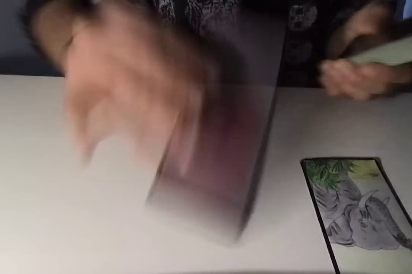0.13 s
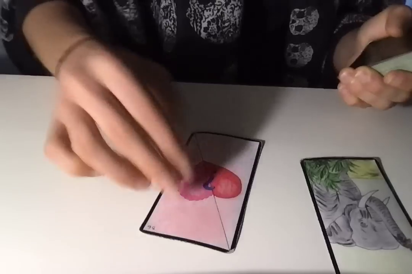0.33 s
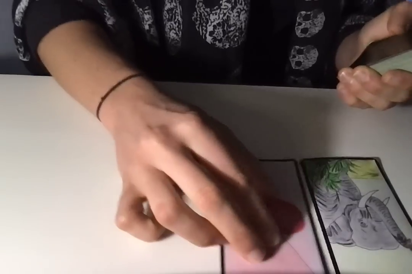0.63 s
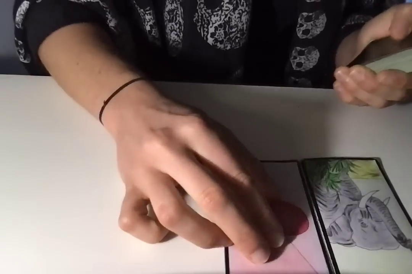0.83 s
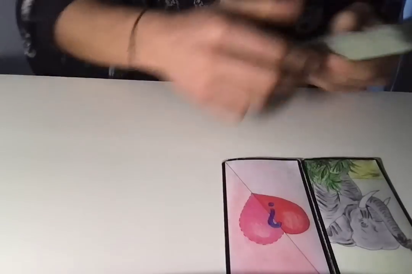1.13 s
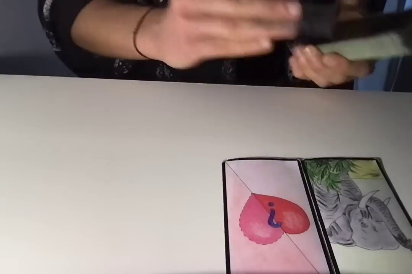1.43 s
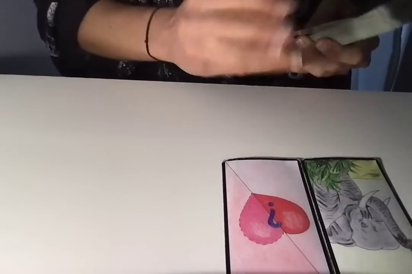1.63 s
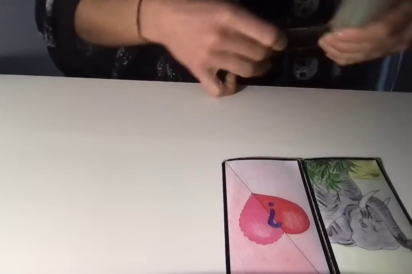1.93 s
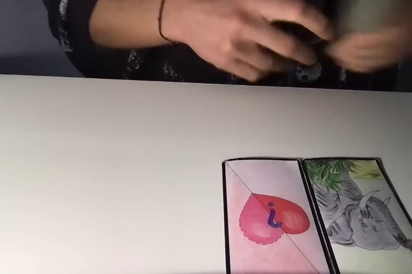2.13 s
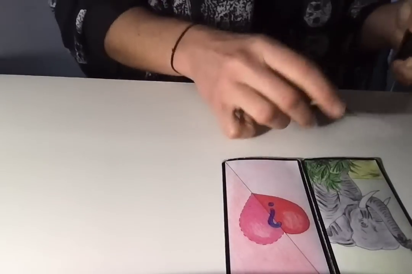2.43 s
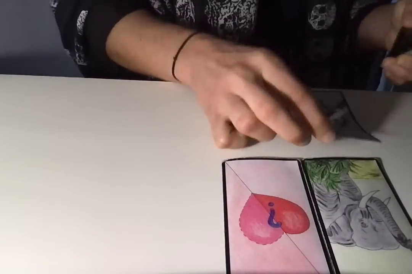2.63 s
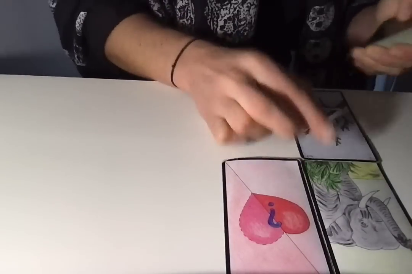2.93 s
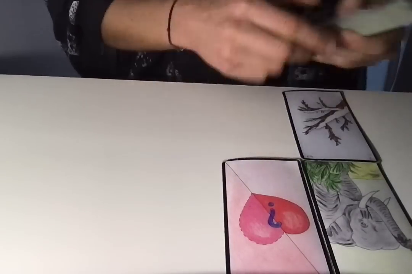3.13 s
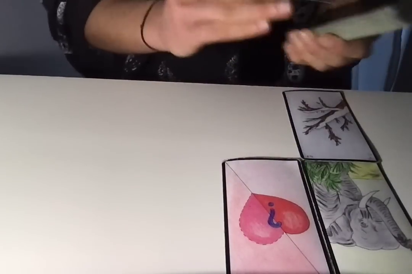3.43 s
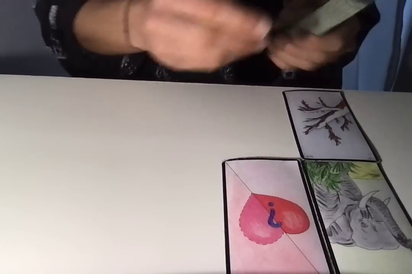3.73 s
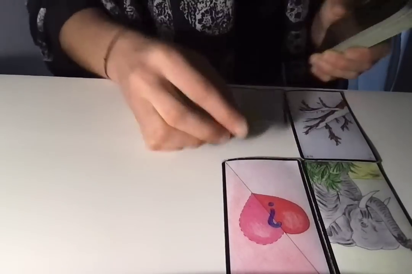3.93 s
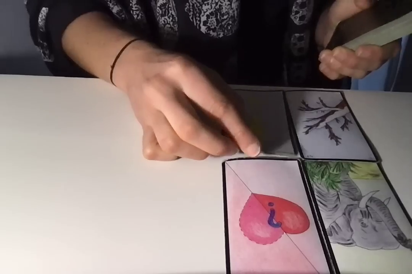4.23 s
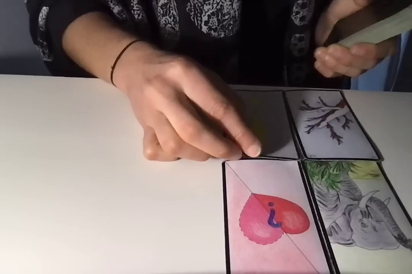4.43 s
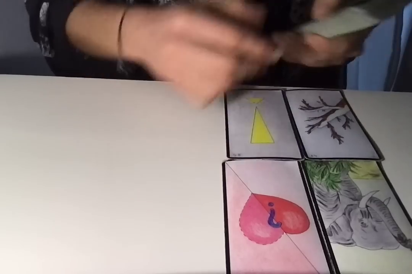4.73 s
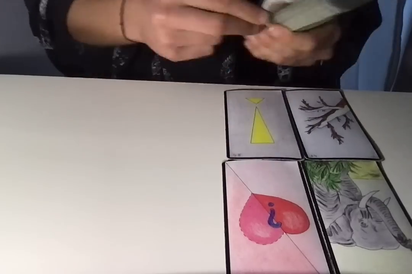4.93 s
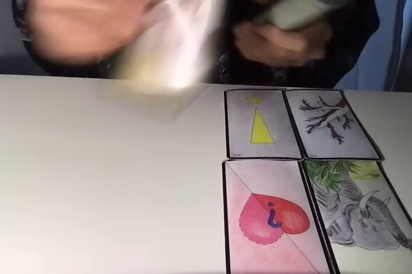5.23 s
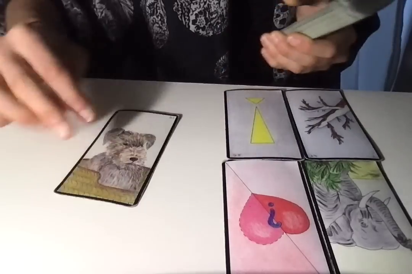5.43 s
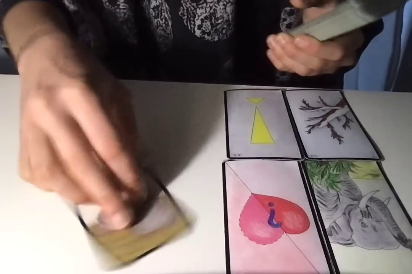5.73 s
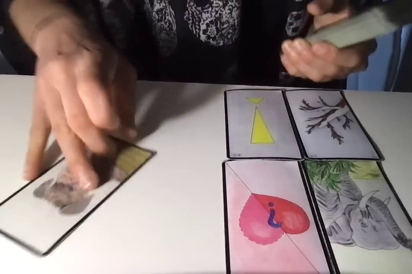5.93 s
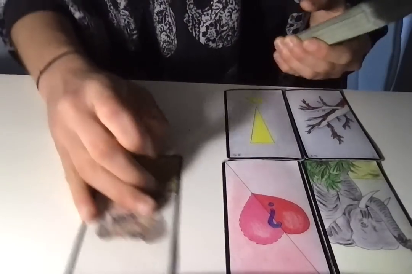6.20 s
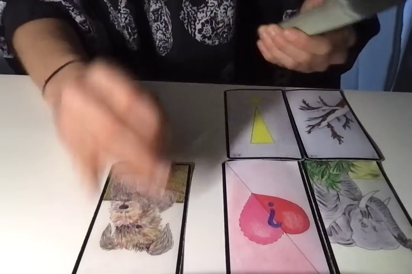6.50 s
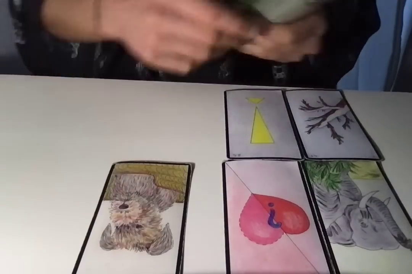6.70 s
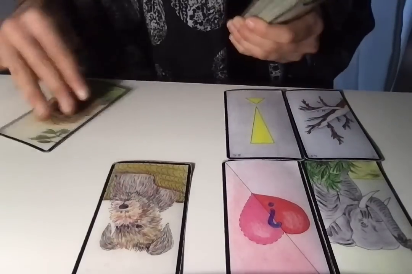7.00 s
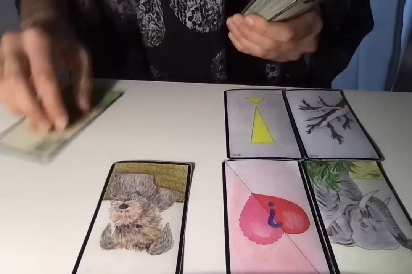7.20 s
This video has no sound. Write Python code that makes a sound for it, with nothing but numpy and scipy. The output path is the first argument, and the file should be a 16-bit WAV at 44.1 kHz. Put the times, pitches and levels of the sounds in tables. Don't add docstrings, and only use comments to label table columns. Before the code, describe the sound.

Someone deals large paper cards indoors, one after another. Dry flicks and rasping pulls from the deck alternate with crisp slaps, edge ticks and small pops of trapped air. Gentle stretches of rustle and near silence separate them. Fingers bump the hollow table softly, and later cards are turned and slid with thin hisses. Faint low table shake, still air and a short dull echo surround the close sounds.

```python
import sys
import numpy as np
from scipy import signal
from scipy.io import wavfile
from scipy.ndimage import uniform_filter1d

SR = 44100
rng = np.random.default_rng(int(sys.argv[2]) if len(sys.argv) > 2 else 0)


def store_wav(level_fs):
    pcm = np.round(np.clip(np.atleast_2d(level_fs), -1, 1) * 32767)
    wavfile.write(sys.argv[1], SR, pcm.T.astype(np.int16))


def voltage_ratio(level):
    return 10 ** (np.asarray(level, float) / 20)


N = 324576


def evened(x):
    return x / np.sqrt(np.mean(x ** 2) + 1e-20)


def read(points, hz):
    f, value = np.transpose(points)
    return np.interp(np.log(hz + 1), np.log(f + 1), value)


def add(mix, s, sound):
    part = mix[round(s * SR):][:len(sound)]
    part += sound[:len(part)]


def ring(x, hz, width):
    r = np.exp(-np.pi * width / SR)
    turn = 2 * np.pi * hz / SR
    return signal.lfilter([1 - r], [1, -2 * r * np.cos(turn), r * r], x) * np.sin(turn)


def moving_ring(x, hz, width):
    turn = np.exp(2j * np.pi * np.cumsum(hz) / SR)
    r = np.exp(-np.pi * width / SR)
    return (turn * signal.lfilter([1], [1, -2 * r, r * r], x / turn)).real


def patchy(x, spectrum, patch_db, size):
    hz, t, z = signal.stft(x, SR, nperseg=size, noverlap=3 * size // 4)
    patches = rng.standard_normal(z.shape[::-1]).T
    patches = uniform_filter1d(patches, size=6, axis=0)
    patches = evened(uniform_filter1d(patches, size=14, axis=1))
    z = z * voltage_ratio(read(spectrum, hz)[:, None] + patch_db * patches)
    return evened(signal.istft(z, nperseg=size, noverlap=3 * size // 4)[1][:N])


# time in seconds, level in dB.
SHAKE = [(0.0, -50), (0.37, -45.5), (0.98, -55), (1.47, -56.5), (2.07, -55), (3.54, -52), (4.96, -56.5),
         (5.43, -47.5), (5.62, -51), (6.6, -57), (7.36, -51)]
# frequency in Hz, level in dB per Hz.
SHAKE_COLOUR = [(12, -21), (20, -6), (49, 6.5), (66, 2.5), (81, -10.5), (113, -14.5), (140, -28),
                (180, -40), (310, -120)]
# frequency in Hz, level in dB per Hz.
AIR_COLOUR = [(65, -44), (110, -15), (151, -2), (254, -20), (289, -19), (430, -26), (458, -25.5),
              (601, -21.5), (858, -21), (1330, -34.5), (1710, -36), (2350, -33), (10200, -40.5),
              (14500, -44), (16500, -46)]
AIR_DB = -67.5


def background():
    s, db = np.transpose(SHAKE)
    low, air = rng.standard_normal((2, N))
    shake_level = voltage_ratio(np.interp(np.arange(N) / SR, s, db))
    shake = shake_level * patchy(low, SHAKE_COLOUR, 2.4, size=4096)
    return shake + voltage_ratio(AIR_DB) * patchy(air, AIR_COLOUR, 0.4, size=1024)


# start in seconds, fall in ms, rasp in dB, low rustle and fine hiss in dB relative to the rasp.
FLICKS = [(0.0, 54, -52, -4.5, -2.5), (0.044, 8.3, -55.5, 8, 11.5), (0.188, 81, -38, -3.5, -10),
          (1.178, 51, -65.5, 7.5, -22.5), (1.321, 52, -48, 1, -7), (1.366, 55, -45, 0, -10),
          (1.731, 70, -65, 7.5, -8), (2.048, 130, -60.5, 2, -15), (2.185, 27, -72, 16.5, -25),
          (2.525, 200, -65, -8, -9), (2.883, 25, -40.5, -7, -19), (2.925, 66, -60, -5, -12),
          (3.096, 29, -66, 1, -7), (3.138, 112, -53.5, 2.5, -16), (3.365, 99, -51, 2.5, -7.5),
          (3.596, 12, -68.5, -11, -16.5), (3.7, 32, -56.5, 4, -21), (3.859, 21, -44, 3, -21),
          (4.496, 22, -48, -3.5, -12), (5.198, 24.5, -56.5, 15, -23), (5.245, 125, -70, 10.5, 3.5),
          (5.35, 78, -42, -5.5, -11), (7, 69, -40.5, -22, 0), (0.191, 20, -36, -6, -6),
          (6.712, 60, -70, 2, -12), (3.374, 40, -48, -4, -14), (5.045, 40, -68, 2, -15),
          (4.925, 35, -74, 0, -30), (2.545, 25, -68, -10, 4)]
FLICK_RISE_MS, FLICK_RISE_SHARE = 4.4, 0.025
# start in seconds, length in ms, rasp in dB, low rustle in dB relative to the rasp.
PULLS = [(1.218, 115, -52, -1), (1.495, 128, -63.5, 9), (1.75, 170, -59, -8.5), (1.939, 123, -71.5, 6),
         (2.088, 82, -56, -5), (2.25, 69, -45, -14.5), (2.32, 185, -57.5, -5.5), (3.224, 98, -50, -10.5),
         (3.47, 127, -66.5, 10.5), (3.744, 94, -56, 0), (5.122, 91, -51, -8), (6.54, 59, -62, -20),
         (6.664, 49, -61, -7)]
PULL_RISE_SHARE, PULL_HISS_DB, PULL_HISS_PER_DB = 0.31, -6.5, 0.35
# start in seconds, rise in ms, fall in ms, rasp in dB, fine hiss in dB relative to the rasp.
GLIDES = [(0.398, 52, 250, -56, 3.5), (0.974, 74, 57, -65, -2.5), (3.898, 22, 88, -61, -1),
          (5.582, 45, 95, -59, 9), (5.66, 117, 31, -64, 13.5), (5.797, 86, 33, -69, 24),
          (5.9, 18.6, 100, -60, 1), (6.027, 26, 95, -47.5, -3), (6.08, 52, 205, -61.5, 6),
          (6.79, 43, 84, -51.5, -2.5), (6.92, 33, 27, -58.5, 2), (7.175, 29, 49, -54, 3.5),
          (7.22, 46, 420, -66.5, 17.5), (6.002, 22, 40, -76, 23.5), (3.3, 14, 4, -50, -5),
          (0.398, 6, 30, -60, -8)]
GLIDE_RUSTLE_DB, GLIDE_RUSTLE_PER_DB = -4.5, 0.2


def strokes():
    rows = []
    for s, fall_ms, *levels in FLICKS:
        rows.append((s, FLICK_RISE_MS + FLICK_RISE_SHARE * fall_ms, fall_ms, *levels))
    for s, ms, db, rustle_db in PULLS:
        hiss_db = PULL_HISS_DB + PULL_HISS_PER_DB * rustle_db
        rows.append((s, PULL_RISE_SHARE * ms, (1 - PULL_RISE_SHARE) * ms, db, rustle_db, hiss_db))
    for *row, hiss_db in GLIDES:
        rows.append((*row, GLIDE_RUSTLE_DB + GLIDE_RUSTLE_PER_DB * hiss_db, hiss_db))
    return rows


# frequency in Hz, level in dB per Hz.
RASP = [(800, -45), (1250, -19), (1550, -12.5), (1900, -5.5), (2500, -7), (3000, -7), (3700, -8),
        (4500, -9), (5200, -12.5), (6000, -17.5), (7500, -13), (9500, -48), (15000, -110.)]
# frequency in Hz, level in dB per Hz.
RUSTLE = [(65, -13), (110, -2.5), (141, -5.5), (306, -3.5), (412, -17), (708, -10), (1180, -11.5),
          (1400, -24.5), (1820, -50), (3080, -120)]
# frequency in Hz, level in dB per Hz.
HISS = [(2940, -23.5), (5000, -11), (8000, -7), (9910, -12), (11700, -8), (13800, -15), (14900, -9.5),
        (16100, -30.5), (16500, -51.5)]


def slides():
    slip_sizes = np.minimum(rng.exponential(1, N), 5)
    grit = rng.standard_normal((3, N)) * voltage_ratio(2.6 * slip_sizes)
    flutter = evened(uniform_filter1d(rng.standard_normal(N), size=200))
    waver = voltage_ratio(np.outer([2.6, 2.6, 1.1], flutter))
    layers = [patchy(grit[0], RASP, 2.5, size=256), patchy(grit[1], RUSTLE, 3.1, size=512),
              patchy(grit[2], HISS, 2.2, size=512)]
    power = np.zeros((3, N))
    for s, rise_ms, fall_ms, rasp_db, rustle_db, hiss_db in strokes():
        rise = np.arange(0, rise_ms / 1000, 1 / SR) / (rise_ms / 1000)
        fall = np.arange(0, fall_ms / 1000, 1 / SR) / (fall_ms / 1000)
        dying = 1.15 + 1.2 * np.exp(-(rise_ms / 28) ** 2)
        speed = np.concatenate([np.sin(np.pi / 2 * rise), np.cos(np.pi / 2 * fall) ** dying])
        for layer, db in zip(power, (rasp_db, rasp_db + rustle_db, rasp_db + hiss_db)):
            add(layer, s, (voltage_ratio(db) * speed) ** 2)
    return (np.sqrt(power) * layers * waver).sum(0)


def singing_slips(table, width_hz, width_share):
    out = np.zeros(N)
    for (s, ms, from_hz, to_hz, db), chance in zip(table, rng.standard_normal((len(table), 2, 9000))):
        u = np.arange(0, ms / 1000, 1 / SR)[:9000] / (ms / 1000)
        slow_grip = evened(uniform_filter1d(chance[1], size=180))
        slips = (chance[0] * voltage_ratio(3.0 * chance[1] + 3.5 * slow_grip))[:len(u)]
        pitch = from_hz * (to_hz / from_hz) ** u
        sound = evened(moving_ring(slips, pitch, width_hz + width_share * from_hz))
        add(out, s, voltage_ratio(db) * sound * np.minimum(u / 0.11, 1) * (1 - u) ** 0.33)
    return out


# start in seconds, length in ms, start pitch in Hz, end pitch in Hz, level in dB.
DRAGS = [(0.0, 30, 2200, 2200, -56), (2.34, 140, 2250, 2650, -55), (2.345, 70, 2750, 2700, -58),
         (2.53, 60, 5000, 4800, -62), (2.53, 150, 2200, 2350, -67), (1.83, 65, 2100, 2200, -60),
         (3.225, 85, 2150, 2300, -56), (3.378, 50, 2550, 2400, -52), (3.752, 50, 1750, 2150, -56),
         (3.763, 32, 2700, 3000, -56), (3.765, 32, 1050, 1050, -55), (3.98, 150, 2450, 2300, -72),
         (5.343, 9, 1350, 900, -38), (6.93, 36, 5300, 5000, -59), (6.93, 38, 2500, 2250, -59),
         (7.02, 50, 2900, 3200, -46), (6.038, 70, 2300, 2500, -52)]


def drags():
    return singing_slips(DRAGS, width_hz=200, width_share=.15)


# start in seconds, level in dB, pitch in Hz, length in ms.
PRESSES = [
    (0.029, -33.5, 63.6, 35.6),
    (1.217, -42, 89, 28),
    (1.334, -24.5, 74, 5.5),
    (1.911, -38.5, 84, 25),
    (3.313, -27.5, 80.6, 11.5),
    (5.255, -37, 88, 18),
    (5.331, -30.5, 81.5, 29),
    (6.935, -42, 71, 39),
]
# start in seconds, level in dB, pitch in Hz, length in ms.
LIFTS = [(0.271, -40, 58, 68), (0.441, -40.5, 55, 13), (0.514, -44.5, 62.5, 24), (3.856, -32.5, 72.4, 19),
         (3.938, -43.5, 74.7, 19), (5.206, -37, 78, 22), (5.594, -32, 60.5, 25), (5.918, -29.5, 78, 26.6),
         (5.989, -42.5, 74.5, 30), (6.88, -32, 70, 11.5), (7.188, -27.5, 85, 28.7)]


def thuds():
    out = np.zeros(N)
    for s, db, hz, ms, push in [(*row, 1) for row in PRESSES] + [(*row, -1) for row in LIFTS]:
        u = np.arange(round(4 * ms * SR / 1000)) / (ms * SR / 1000)
        swing = (1 - np.exp(-(u / .3) ** 2)) * np.exp(-(u / 1.3) ** 3)
        thud = push * 1.51 * voltage_ratio(db) * swing * np.sin(2 * np.pi * hz * u * ms / 1000)
        add(out, max(s - 0.0002 * ms, 0), thud)
    return out


# peak time in seconds, pitch in Hz, length in ms,
# level in dB.
BLIPS = [(.049, 2850, 8.4, -44), (.152, 2380, 6.9, -51), (.15, 3100, 9, -54), (.196, 2800, 6.5, -30.5),
         (.2015, 2190, 5, -39), (1.347, 2530, 6.9, -45), (1.379, 3880, 5.8, -40), (2.206, 1800, 10, -56),
         (2.208, 2530, 12, -57), (2.29, 2120, 7.3, -46), (3.146, 1390, 10.5, -50), (3.311, 2300, 10, -49),
         (3.318, 2300, 7, -42), (3.495, 2100, 8, -52.5), (3.606, 2630, 9, -53), (3.8, 2070, 6.5, -44.5),
         (4.26, 1790, 11, -64), (4.5, 4470, 7, -50), (4.573, 2020, 10, -65), (4.832, 2100, 10.2, -63),
         (5.25, 2050, 8.5, -54), (5.316, 2270, 7.1, -55), (5.318, 1290, 6, -54), (5.328, 2380, 6, -50),
         (6.72, 1560, 13, -54), (6.852, 2000, 6.7, -48), (6.882, 2500, 9, -40), (7.017, 2740, 6, -29),
         (7.177, 3100, 5, -45),
         (.153, 840, 7.4, -53), (.28, 438, 25, -52), (.408, 520, 12, -60), (.445, 506, 13, -57),
        (1.247, 696, 8.2, -45), (2.264, 600, 10.3, -36), (2.302, 600, 8.7, -52), (3.187, 428, 13, -51),
        (3.24, 720, 16, -48.5), (3.572, 296, 9.6, -49.5), (3.705, 380, 10, -40.5), (3.804, 600, 7.9, -45.5),
        (4.392, 800, 8, -65.5), (4.5, 329, 9.6, -49), (5.298, 1020, 7, -52), (5.307, 1030, 7, -51),
        (5.36, 1150, 5.5, -37), (5.367, 650, 9, -43), (5.398, 694, 10.4, -46), (5.428, 680, 11.6, -46.5),
        (6.045, 1305, 15, -52), (6.07, 876, 14, -49), (6.08, 340, 18, -46), (6.676, 1060, 8, -57),
        (6.751, 740, 12, -50), (6.873, 736, 12, -47.5), (7.19, 294, 11, -47), (3.712, 180, 26, -42),
        (7.035, 200, 30, -46), (5.2, 170, 22, -46), (3.476, 620, 16, -44), (3.53, 700, 10, -44),
        (3.705, 1000, 8, -48), (5.205, 800, 8, -44), (6.731, 1380, 14, -57), (5.3425, 1050, 5, -27.5),
        (5.075, 650, 20, -56), (5.122, 700, 16, -52),
         (.031, 2750, 6, -35), (2.253, 2400, 6, -42), (2.253, 3900, 5, -45), (3.365, 2600, 8, -40),
         (3.47, 3700, 7, -54), (3.86, 2600, 7, -38), (3.876, 1950, 7, -42), (5.354, 2550, 6, -37),
         (5.385, 2300, 5, -43), (6.77, 2300, 7, -46), (7.005, 2700, 7, -33), (7.017, 4100, 5, -37)]
BLIP_SAG = .06
BLIP_ROUGH, BLIP_GRIT = .5, .25


def blips():
    out = np.zeros(N)
    table = BLIPS
    for (s, hz, ms, db), chance in zip(table, rng.standard_normal((len(table), 2, 2000))):
        u = np.arange(0, ms / 1000, 1 / SR)[:2000] / (ms / 1000)
        turns = np.cumsum(hz * (1 + BLIP_SAG * (.5 - u))) / SR
        flutter = 1 + BLIP_ROUGH * evened(uniform_filter1d(chance[0], size=round(SR / hz)))[:len(u)]
        grit = BLIP_GRIT * evened(ring(chance[1], hz, hz))[:len(u)]
        swell = 1.1 * voltage_ratio(db) * np.sin(np.pi * u ** .75) ** 2
        add(out, s - ms / 2500, swell * (flutter * np.sin(2 * np.pi * turns) + grit))
    return out


# frequency in Hz, width in Hz, level in dB.
CARD = [(1150, 150, 5), (2240, 230, 11.5), (2680, 500, 14), (3760, 810, 4), (5200, 620, -8.5)]
CARD_MIN_WIDTH_HZ = 220
CREEP = 50


def snap(crack_db, hollow_db, sizzle_db, ms, hollow_hz, chance):
    t = (np.arange(chance.shape[1]) - CREEP) / SR
    creep = .5 * np.exp(t / 0.00048)
    crackle = np.exp(-abs(t / (0.0015 * ms)) ** 1.6)
    slips = .5 * chance[0] * (chance[1] > .9) * np.where(t < 0, creep, crackle)
    slips[CREEP] = -3.4 / np.sqrt(ms)
    bend = np.exp(.06 * chance[1, -len(CARD):])
    crack = 0
    for b, (hz, width, db) in zip(bend, CARD):
        tilt_db = 1.2 * (sizzle_db + 12.5) * np.log2(max(hz / 2500, 1))
        crack = crack + voltage_ratio(db + tilt_db) * ring(slips, hz * b, max(width, CARD_MIN_WIDTH_HZ))
    hollow = ring(ring(slips, hollow_hz, 290), hollow_hz, 290)
    hollow = hollow + 0.19 * ring(slips, 0.27 * hollow_hz, 100)
    bright = signal.lfilter(*signal.butter(2, 4200, "high", fs=SR), slips)
    sizzle = ring(bright, 5600, 3500)
    head, long_head = slice(CREEP, CREEP + 130), slice(CREEP, CREEP + 260)
    layers = crack / np.std(crack[head])
    layers = layers + voltage_ratio(hollow_db - 0.6) * hollow / np.std(hollow[long_head])
    layers = layers + voltage_ratio(sizzle_db - 10.5) * sizzle / np.std(sizzle[head])
    return voltage_ratio(crack_db - 0.5) * layers


# start in seconds, crack in dB, hollow ring and sizzle in dB relative to the crack, hollow pitch in Hz.
KNOCKS = [(0.0294, -27, 3, -14, 700), (1.2157, -36.5, 7.5, -9, 710), (1.4955, -56, 21, -22, 513),
          (1.5084, -49.5, 8, -10, 524), (1.5193, -52, -1, -24, 566), (1.5401, -41.5, 10, -5, 506),
          (1.7325, -52, 9, 2, 520), (1.979, -55.5, 0, -22, 566), (2.118, -61, 15, 0, 605),
          (2.1892, -53.5, 1, -16, 660), (3.3165, -38, 8.5, -1, 502), (3.4702, -46, 11, -18, 536),
          (3.5121, -40.5, 3, -8, 696), (3.5312, -51, 11, -1, 656), (4.8272, -60.5, 3, -6, 590),
          (5.0283, -57, 7, -34, 596), (5.0982, -49, 3, -34, 734), (5.183, -42.5, -0.5, 3, 650),
          (5.2605, -44.5, 7.5, 9.5, 392), (5.3265, -56, 9, -32.5, 590), (6.6734, -58, -2, 1, 1030),
          (6.7693, -35, 1, -4.5, 720), (6.8665, -49, -4, 8, 740)]
KNOCK_MS, KNOCK_MS_PER_DB = 2.47, -.09
# start in seconds, crack in dB, sizzle in dB relative to the crack, crackle length in ms.
CATCHES = [(0.1794, -31.5, 12, 4), (1.332, -22.5, -9.5, 2.5), (1.6141, -52.5, -4, 3.2),
           (1.936, -47, -35, 4.4), (2.022, -46, -16, 2.6), (2.0493, -34, -11, 2), (2.251, -36.5, -19, 1.3),
           (2.2606, -35, -5, 4.1), (2.472, -53, -20.5, 3.1), (3.704, -41, -49, 0.97),
           (3.815, -43.5, -15, 2.5), (3.8576, -29.5, 6, 2.3), (4.2582, -58.5, -7, 5.8),
           (4.5005, -51, 16.5, 4.1), (5.2067, -33, -44, 3.2), (5.3524, -34, -11, 1.4),
           (5.386, -41, 5.5, 2.2), (5.5719, -48, 8, 10.6), (6.8807, -39, -4, 2.9),
           (6.9885, -30.5, 7.5, 3.2), (7.1753, -51, 0, 7.6)]
CATCH_HOLLOW_DB, CATCH_HZ = -2, 590.
# start in seconds, crack in dB, sizzle in dB relative to the crack, crackle length in ms.
FLAPS = [(0.0423, -34, -1, 1.2), (0.1488, -52, 12, 2.5), (0.1842, -27.5, -17.5, 0.96),
         (0.1901, -20.5, 1.5, 1.6), (1.3677, -30, 7, 1.5), (1.3788, -32, -21, 2.1), (2.2724, -57, -37, 1.1),
         (2.8852, -38, 6, 3.3), (3.363, -29.5, 4, 3.2), (3.3727, -32.5, -44, 5.6), (3.603, -54, -6, 5.8),
         (3.797, -46, -1.5, 5.4), (3.8738, -36.5, 3, 1.1), (3.9739, -50.5, -20, 3),
         (4.8835, -46.5, -28, 2.6), (5.3409, -18.5, 8, 1.1), (5.3761, -32, 6, 2.4), (5.597, -53, 4, 1.4),
         (6.039, -47.5, -7, 5.3), (6.5562, -57, -9, 2.3), (7.003, -22, 3, 2.2), (7.0121, -26.5, -11, 3.4),
         (7.0166, -46, 31, 2)]
FLAP_HOLLOW_DB, FLAP_HOLLOW_PER_DB, FLAP_HZ, FLAP_HZ_PER_DB = -15.5, 0.5043, 720., 15
# start in seconds, peak in dB, sizzle in dB relative to the peak.
TICKS = [(1.5315, -30.5, -2), (1.707, -49, -20), (2.1015, -42, -21), (2.8753, -38.5, -22.5),
         (3.1408, -38, -30), (3.5057, -35, -1), (2.9349, -46, 14), (4.582, -52, 5), (6.8868, -33, -15),
         (3.7012, -33, -2), (.4005, -52, -10), (3.734, -48, 5)]


def snaps():
    out = np.zeros(N)
    rows = []
    for s, db, hollow_db, sizzle_db, hz in KNOCKS:
        rows.append((s, db, hollow_db, sizzle_db, KNOCK_MS + KNOCK_MS_PER_DB * (db + 26.5), hz))
    for s, db, sizzle_db, ms in CATCHES:
        rows.append((s, db, CATCH_HOLLOW_DB, sizzle_db, ms, CATCH_HZ))
    for s, db, sizzle_db, ms in FLAPS:
        hollow_db = FLAP_HOLLOW_DB + FLAP_HOLLOW_PER_DB * (db + 35)
        hz = FLAP_HZ + FLAP_HZ_PER_DB * np.clip(sizzle_db, -20, 20)
        rows.append((s, db, hollow_db, sizzle_db, ms, hz))
    for s, db, sizzle_db in TICKS:
        rows.append((s, db - 10.0, -6.5, sizzle_db - 0.5, 1.8, 600.))
    for (s, *settings), chance in zip(rows, rng.standard_normal((len(rows), 2, 800))):
        add(out, s + .3e-3 - CREEP / SR, snap(*settings, chance))
    return out


# start in seconds, length in ms, start pitch in Hz, end pitch in Hz, level in dB.
SCRAPES = [(0.032, 10, 3600, 3800, -53), (1.365, 84, 1150, 1080, -50), (1.5, 16, 2700, 2600, -60),
           (3.215, 66, 694, 645, -55.5), (2.345, 50, 2100, 2300, -59), (3.935, 28, 226, 180, -52),
           (4.254, 12, 4400, 5000, -58.5), (4.9, 204, 600, 720, -61), (5.11, 56, 697, 690, -56),
           (6.035, 80, 1150, 1300, -53), (6.7, 55, 780, 810, -60), (6.882, 32, 200, 168, -41),
           (6.815, 60, 2300, 2200, -53), (5.275, 62, 700, 1100, -56), (5.889, 130, 260, 180, -51.5),
           (6.78, 70, 950, 800, -55), (5.9, 73, 1800, 1300, -58.5), (7.205, 155, 6000, 12000, -51),
           (4.52, 32, 2900, 3400, -60), (5.945, 41, 800, 450, -59)]


def scrapes():
    return singing_slips(SCRAPES, width_hz=100, width_share=.28)


# frequency in Hz, time to fall 60 dB in seconds.
ROOM = [(150, 0.33), (660, 0.2), (1740, 0.26), (4590, 0.26), (12000, 0.31)]


def room(x):
    out = np.zeros(N)
    at = np.arange(160, SR // 3 - 20, 20)
    for k in range(3):
        taps = np.zeros(SR // 3)
        taps[at + rng.integers(0, 20, len(at))] = rng.choice([-1., 1.], len(at))
        hz, t, z = signal.stft(taps, SR, nperseg=256)
        z = z / np.sqrt(uniform_filter1d(abs(z) ** 2, size=7, axis=1) + 1e-6)
        decay = voltage_ratio(-60 * t / read(ROOM, hz)[:, None])
        tail = signal.istft(z * decay, SR, nperseg=256)[1]
        tail = tail * np.minimum(np.arange(len(tail)) / 650, 1)
        share = np.sqrt(2 / 3) * np.cos(2 * np.pi * (1.7 * np.arange(N) / SR + k / 3))
        out += signal.oaconvolve(x * share, tail / np.linalg.norm(tail))[:N]
    return out


def scene():
    hits = snaps()
    rubbing = slides() + scrapes()
    sent = voltage_ratio(-10) * hits + voltage_ratio(-6.0) * rubbing
    echo = room(signal.lfilter(*signal.butter(1, 4500, fs=SR), sent))
    return (background() + rubbing + drags() + thuds() + blips() + hits + echo)[None]


def roll_off(x):
    return signal.sosfilt(signal.butter(12, 16800, fs=SR, output="sos"), x)


def record(dry):
    x = signal.lfilter(*signal.butter(2, 32, "high", fs=SR), dry)
    edge = signal.firwin(255, 15950, window=("kaiser", 9), fs=SR)
    mix = signal.oaconvolve(x, edge[None], "same")
    return roll_off(mix)


dry = scene()
out = record(dry)
store_wav(out)
```